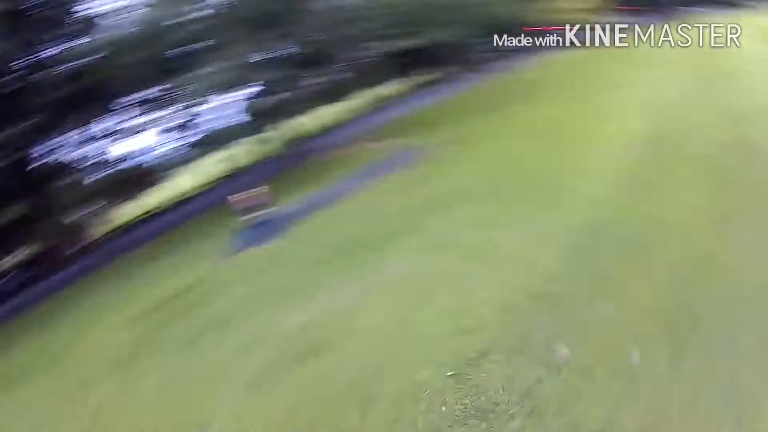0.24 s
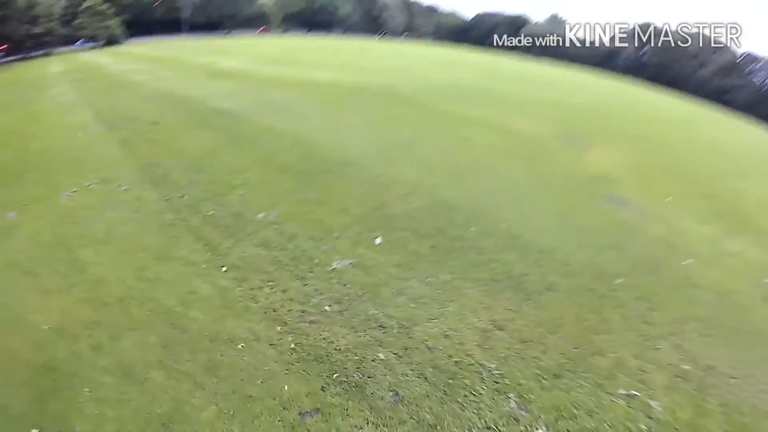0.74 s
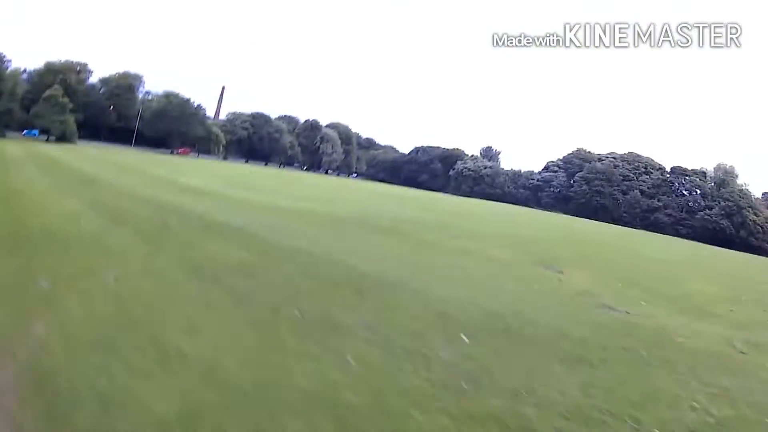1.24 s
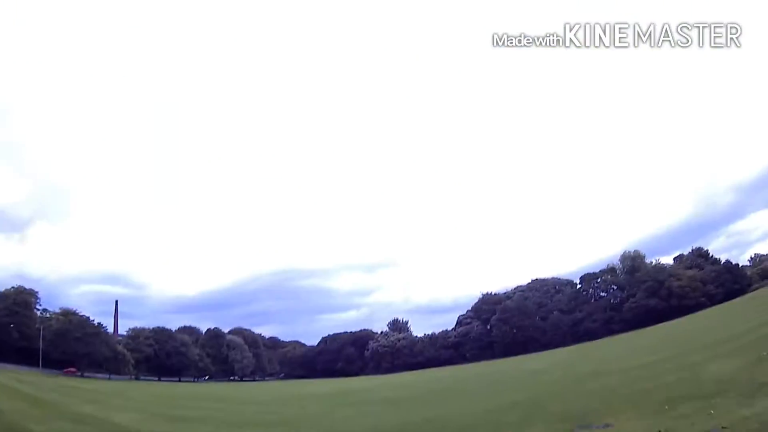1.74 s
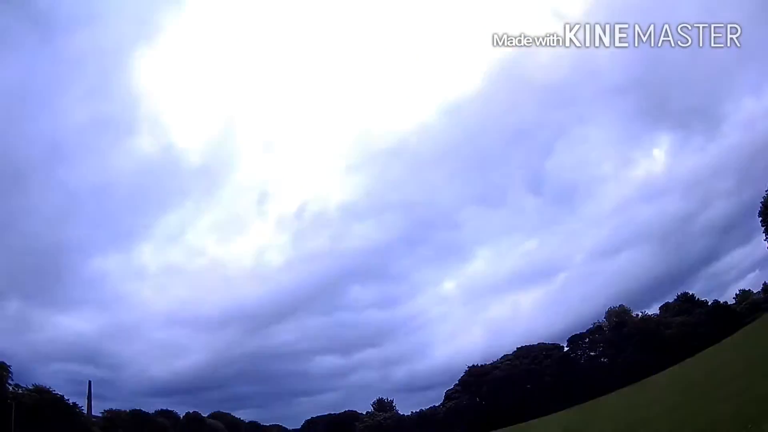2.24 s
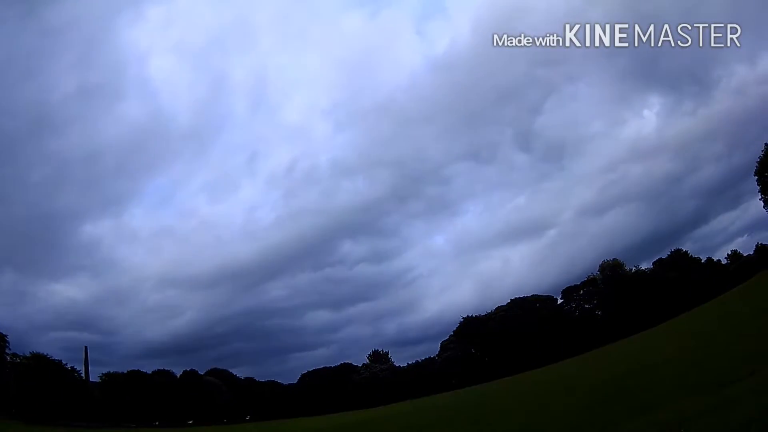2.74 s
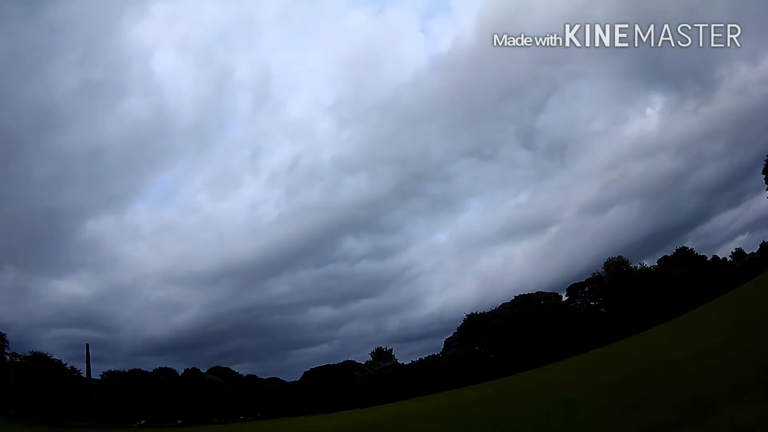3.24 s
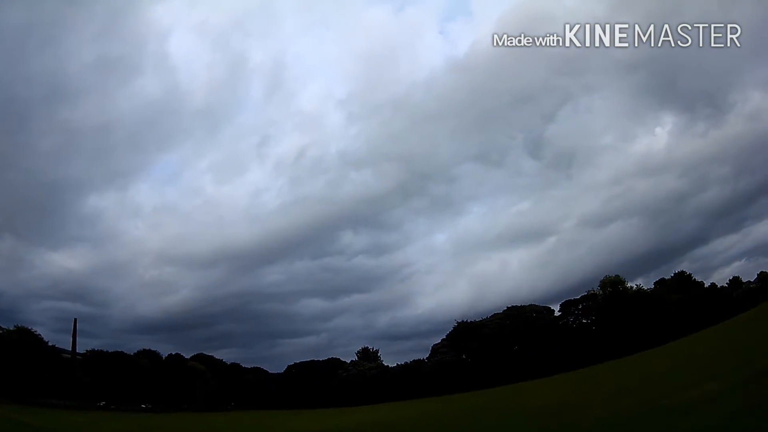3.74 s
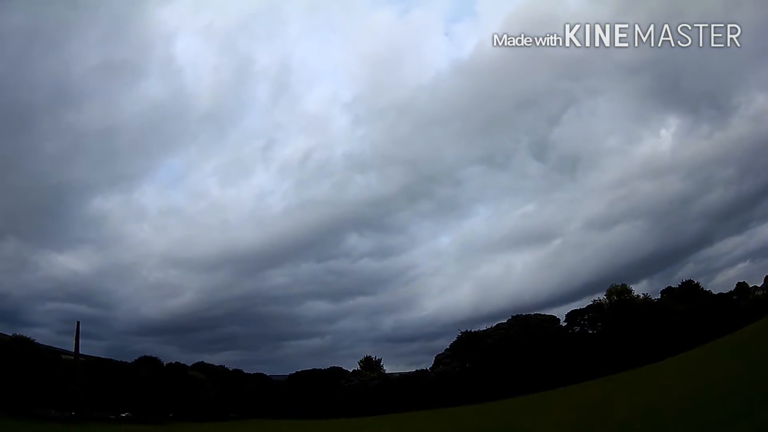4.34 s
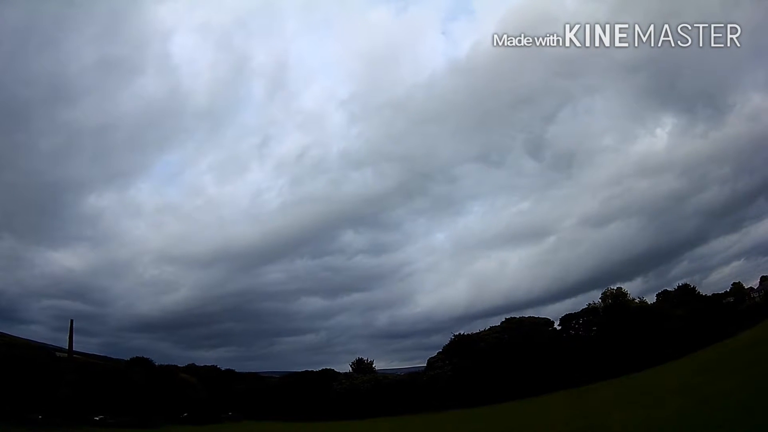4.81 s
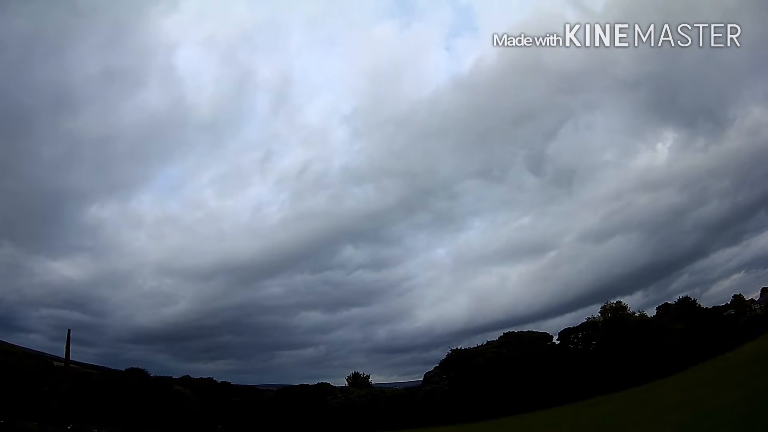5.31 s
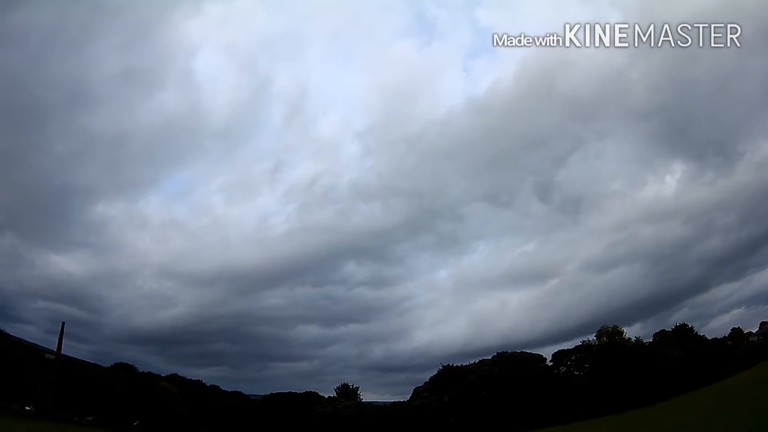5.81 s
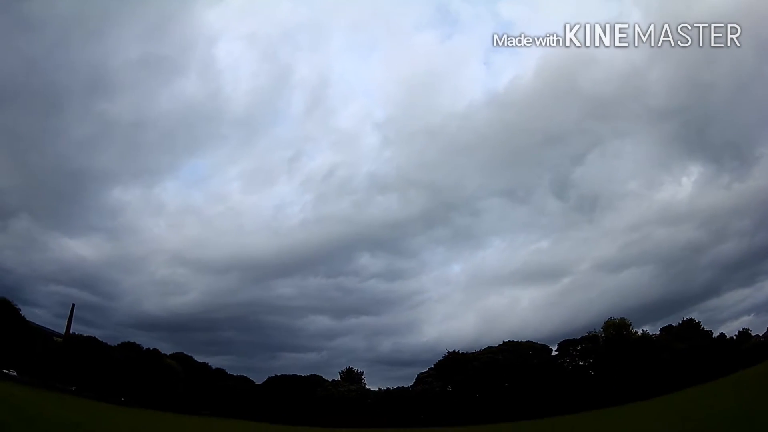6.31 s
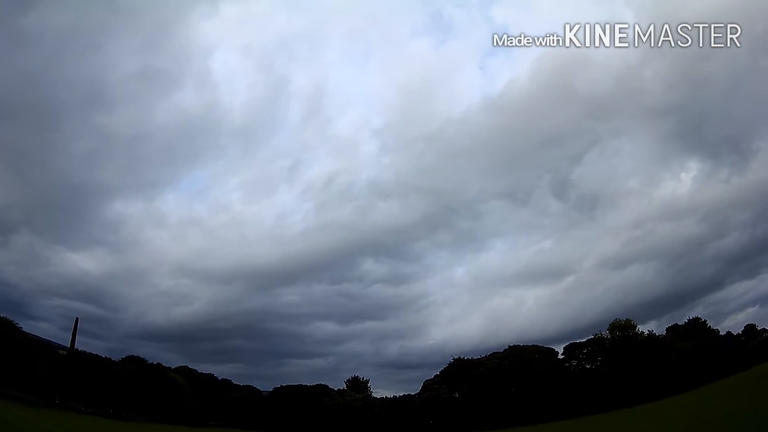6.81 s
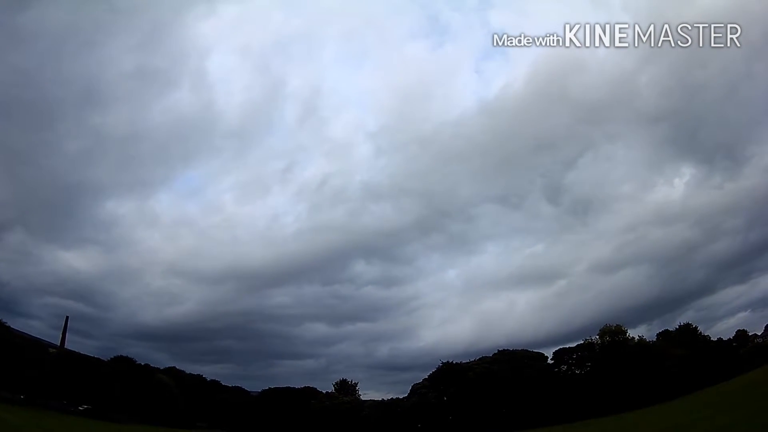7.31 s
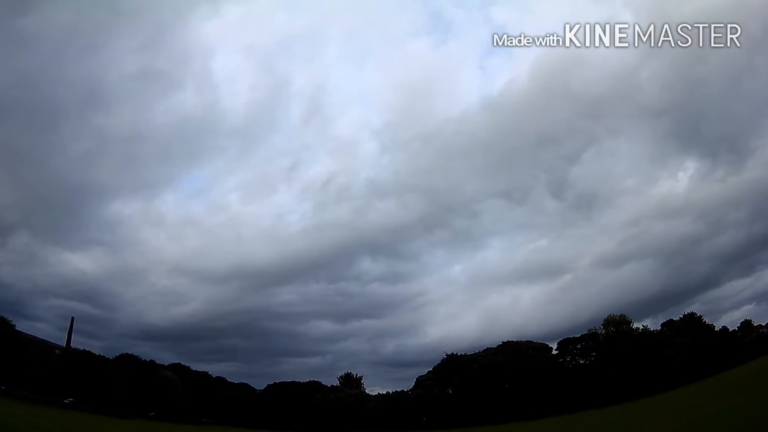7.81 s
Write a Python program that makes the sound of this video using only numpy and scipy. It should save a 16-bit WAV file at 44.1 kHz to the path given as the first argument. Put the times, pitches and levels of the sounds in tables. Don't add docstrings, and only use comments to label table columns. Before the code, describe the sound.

Close onboard view of a tiny drone: windy propeller buzz surges twice in flight, drops to a faint whine, then three distorted revs.

```python
import sys
import numpy as np
from scipy import signal
from scipy.fft import rfft, irfft, next_fast_len
from scipy.io import wavfile
from scipy.ndimage import uniform_filter1d

SR = 44100
rng = np.random.default_rng(int(sys.argv[2]) if len(sys.argv) > 2 else 0)


def bounce(signal):
    frames = np.transpose(np.atleast_2d(signal))
    limited = np.clip(frames, -1, 1)
    pcm = np.round(limited * 32767).astype(np.int16)
    wavfile.write(sys.argv[1], SR, pcm)


def magnitude_from_level(level_db):
    exponent = np.asarray(level_db, float) / 20
    return 10 ** exponent


N = 355446
T = np.arange(N) / SR
PAD = next_fast_len(N)
HZ = np.fft.rfftfreq(PAD, 1 / SR)


def curves(table):
    s, *columns = np.transpose(table)
    return [uniform_filter1d(np.interp(T, s, c), size=900, mode="nearest") for c in columns]


def law(hz, table):
    at, *columns = np.transpose(table)
    return [np.interp(np.log(hz), np.log(at), c) for c in columns]


def walk(rate, size=N):
    hold = int(SR / rate)
    steps = np.repeat(rng.standard_normal(size // hold + 1), hold)
    return 1.364 * uniform_filter1d(uniform_filter1d(steps, hold), hold)[:size]


def band(hz, width):
    ring = HZ / (hz ** 2 - HZ ** 2 + 1j * HZ * width)
    y = irfft(rfft(rng.standard_normal(PAD)) * ring, PAD)[:N]
    return y / y.std()


def turns(hz, wobble):
    trembling_hz = hz * (1 + wobble * walk(60, size=len(hz)))
    return 2 * np.pi * (rng.random() + np.cumsum(trembling_hz) / SR)


def tone(angle, db, flutter_db):
    level = np.sqrt(2) * magnitude_from_level(db + flutter_db * walk(25, size=len(angle)))
    return level * np.sin(angle + 2 * np.pi * rng.random())


# time in seconds, shaft speed in Hz.
TRIM = [(0.0, 463), (0.259, 277), (0.542, 312.9), (0.62, 370.3), (0.805, 382.1), (1.275, 422.7),
        (2.332, 381.4), (2.75, 470.5), (2.9, 420), (3.392, 132.8), (4.215, 159.3), (5.206, 139),
        (5.285, 188.6), (5.919, 197.8), (6.809, 133.6), (7.29, 134), (7.56, 370.2)]
# start, crest and end in seconds, push against the limit, top speed in Hz.
BLIPS = [
    (0.77, 1.015, 1.303, 0.73, 1169),
    (2.739, 2.981, 3.325, 0.19, 1132),
    (3.639, 3.984, 4.263, 1.51, 1141),
    (5.893, 6.237, 6.618, 2.48, 1144),
    (7.504, 7.751, 8.92, 2.18, 1120),
]
# middle in seconds, length in seconds, change in Hz.
NUDGES = [(0.466, 0.13, 62), (0.631, 0.16, 36), (0.912, .09, 70), (1.555, .131, 25), (1.812, 0.27, 58),
          (2.085, .18, 52), (2.28, .15, 62), (3.476, .24, 76), (4.668, .288, 11), (5.473, 0.13, 14),
          (5.578, .23, -45), (6.092, 0.085, 80), (6.337, .2, -35), (8.047, 0.12, -93)]


def shaft_hz():
    wish, = curves(TRIM)
    for start, crest, end, push, top_hz in BLIPS:
        stick = np.sin(np.pi / 2 * np.interp(T, (start, crest, end), (0, 1, 0))) ** 2
        wish = wish + (top_hz - wish) * np.tanh(push * stick) / np.tanh(push)
    for middle, length, hz in NUDGES:
        wish = wish + hz * np.cos(np.pi * np.clip((T - middle) / length, -.5, .5)) ** 2
    rotor_lag_s = .059
    k = 1 / (rotor_lag_s * SR)
    return wish[0] + signal.lfilter([k], [1, k - 1], wish - wish[0])


# shaft speed in Hz, then levels in dB of the shake, its double,
# its triple, the blade hiss and the downwash rumble.
LOAD = [(134, -46.5, -52.5, -58.5, -36.5, -79), (197, -40.5, -42.5, -48.5, -31.5, -60),
        (290.5, -29.5, -33, -45, -20.5, -64.5), (420, -18.5, -22, -21.5, -15, -62),
        (508, -13.5, -19, -12.5, -14, -42.5), (800, -14.5, -5.5, -8.5, -16.5, -34.5),
        (1001, -16, -8.5, -1.5, -19, -39.5), (1130, -5.5, 2, 6, -16, -38.5)]
# time in seconds, extra level in dB.
GUST = [(0, 4), (.3, 14), (.55, 13), (.8, 6.5), (1, 0.5), (1.38, 6), (1.48, -0.5), (1.86, -0.5), (2, 7.5),
        (2.13, 3.5), (2.7, 6.5), (2.9, 5), (3.3, -2), (5.1, 0), (5.35, 4.5), (5.9, 3), (6.1, 0.5),
        (8.06, 2.5)]


def loudness(hz):
    gust_db, = curves(GUST)
    return law(hz, LOAD) + np.outer((0.33, 0.32, 0.72, 1, 2.1), gust_db)


def nearest_rotor(angle, shake_db, twice_db, third_db, over_db):
    out = tone(angle, shake_db + 0.5, 1.38) + tone(2 * angle, twice_db, 2.1)
    out += tone(3 * angle, third_db - 0.073 * over_db, 1.95)
    out += tone(4 * angle, third_db - 4 - 1.2 * over_db, 4.3)
    return out + tone(5 * angle, third_db - 7 - 1.2 * over_db, 5.5)


# time in seconds, speed as a share of the nearest, shake in dB against the nearest.
SECOND = [(0, 1.38, -1.5), (.14, 1.65, -2.5), (.3, 1.9, 3), (.4, 1.66, 5), (.5, 1.52, -17),
          (.9, 1.15, -19.5), (1.05, 1.027, -16), (1.14, 1.094, -11), (1.5, 1.13, -19), (2.2, 1.12, -12),
          (2.7, 1.224, -5.5), (3, 1.088, -16.5), (3.25, 1.04, -16), (3.5, 1.06, -26.5), (6.12, 1.017, -22),
          (6.24, 1.043, -26), (6.36, 1.08, -26), (8.06, 1.05, -17.5)]


def second_rotor(hz, shake_db, over_db):
    share, second_db = curves(SECOND)
    match = 0.71 * np.interp(hz, (330, 850), (0, 1))
    second_db = shake_db + second_db + (-2.5 - second_db) * match
    angle = turns(hz * share, .0018)
    out = tone(angle, second_db, 1.43) + tone(2 * angle, second_db + 1 - 0.093 * over_db, 3.7)
    return out + tone(3 * angle, second_db - 12 - 1.4 * over_db, 3.4)


# time in seconds, shaft speed in Hz, shake in dB.
THIRD = [
    (0.0, 600, -19.5),
    (0.15, 549, -23),
    (0.3, 423, -36),
]


def third_rotor():
    hz, db = curves(THIRD)
    fade = np.clip((THIRD[-1][0] - T) / 0.066, 0, 1)
    return fade * tone(turns(hz, 0.0022), db, 1.7)


# pitch in Hz, level in dB.
WHINE = [(1900, -44), (2300, -45), (2750, -38), (3300, -24), (4100, -24), (5400, -26), (5800, -60)]


def whine(hz, gain_db):
    db = law(hz, WHINE)[0] + gain_db
    half = turns(hz / 2, .005 * (hz / 2000) ** 2)
    over_db = db - 14 * np.log2(hz / 2000)
    return tone(2 * half, db, 4.0) + tone(3 * half, over_db - 14, 2.3) + tone(4 * half, over_db - 5, 1.2)


# start and length in seconds, first, middle and last pitch in Hz.
STRAYS = [(3.3, .25, 5490, 2646, 2043), (3.51, 0.19, 2650, 2032, 1920), (4.39, .4, 2400, 1885, 1895),
          (4.68, 0.19, 2130, 1920, 1830), (5.55, .15, 2685, 2810, 2565), (5.7, .1, 2950, 2630, 2500),
          (6.61, .2, 5210, 2910, 2220), (6.8, .25, 2218, 1984, 1836), (6.9, .15, 2320, 2210, 2120)]
# start and
# length in seconds, first, middle and last pitch in Hz.
HUNTS = [
    (5.25, .11, 3100, 3350, 3490),
    (5.36, .22, 3440, 3290, 2760),
    (7.335, .07, 2910, 3310, 3790),
]


def whines(near_hz):
    hz = 14 * near_hz
    bite = np.clip(np.gradient(np.log(hz)) * SR / 11, 0, 1)
    rasp_level = magnitude_from_level(law(hz, WHINE)[0] + 7.5 + 5.3 * walk(90))
    rasp = bite * rasp_level * band(3300, 700)
    landed = T > 3.2
    out = landed * (whine(hz, -3 * bite + 1.8 * walk(8)) + rasp)
    for rows, gain_db in ((STRAYS, 1.5), (HUNTS, -13)):
        for start, length, *pitches in rows:
            span = (T > start) & (T < start + length)
            u = (T[span] - start) / length
            glide = np.exp(np.polyval(np.polyfit((0, .5, 1), np.log(pitches), 2), u))
            fade = signal.windows.tukey(len(u), min(.05 / length, 1))
            out[span] += fade * whine(glide, gain_db)
    return out


# pitch in Hz, width in Hz, level in dB.
SHELL = [(494, 62, -18.5), (853, 84, -8.5), (1389, 180, 3.5), (1994, 330, 0), (2695, 700, -1.5),
         (3070, 1100, -8.5), (5270, 1760, 3.5), (6700, 2200, -2.5), (9500, 3300, 5), (13600, 5400, -45.5)]


def hiss(angle, db):
    air = sum(magnitude_from_level(g + 1.2 * walk(14)) * band(f, w) for f, w, g in SHELL)
    air = air * (1 + .45 * np.cos(angle)) * magnitude_from_level(.7 * walk(9))
    return magnitude_from_level(db + 6.0) * air / air.std()


def downwash(db):
    rumble = band(30, 40) + magnitude_from_level(-21.5) * band(200, 330)
    return magnitude_from_level(db + 13.5 + 4.5 * walk(12)) * rumble


def scene():
    hz = shaft_hz()
    shake_db, twice_db, third_db, hiss_db, wash_db = loudness(hz)
    over_db = np.interp(hz, (650, 1042), (0, 16))
    shake_db = shake_db + over_db
    near = turns(hz, .0018)
    out = nearest_rotor(near, shake_db, twice_db, third_db, over_db)
    out += second_rotor(hz, shake_db, over_db) + third_rotor()
    out += whines(hz) + hiss(near, hiss_db - 2 + 0.27 * over_db)
    out += downwash(wash_db + 0.1 * over_db)
    return out[None]


# pitch in Hz, width in Hz.
POLES = [(3450, 1150), (2700, 4200)]
# pitch in Hz, width in Hz.
NOTCHES = [(6080, 500), (8000, 150)]


def top_filter(hz):
    def ring(f, width):
        return 1 - (hz / f) ** 2 + 1j * hz * width / f ** 2
    dips = np.prod([ring(*z) for z in NOTCHES], axis=0)
    return dips / np.prod([ring(*p) for p in POLES], axis=0)


def overload(x):
    ceiling, skew = .56, 0.19
    x = x / ceiling + skew
    x = x / (1 + np.abs(x) ** 30) ** (1 / 30) - skew
    grit = magnitude_from_level(-4) * np.abs(x) ** 1.6 * band(9650, 1900)
    return ceiling * (x + grit)


def low_pass(x):
    return signal.sosfilt(signal.butter(12, 15480, fs=SR, output="sos"), x)


def record(dry):
    x = signal.sosfilt(signal.butter(3, 8100, fs=SR, output="sos"), dry)
    x = overload(x)
    treble_lean = 1 + 1j * HZ / 3000
    x = irfft(rfft(x, PAD) * np.abs(top_filter(HZ) * treble_lean), PAD)[:, :N]
    x = signal.sosfilt(signal.butter(1, 250, "high", fs=SR, output="sos"), x) * magnitude_from_level(-1.1)
    x = signal.sosfilt(signal.butter(2, 13500, fs=SR, output="sos"), x)
    x = x / (1 + np.abs(x / .97) ** 20) ** (1 / 20)
    return low_pass(x)


dry = scene()
out = record(dry)
bounce(out)
```